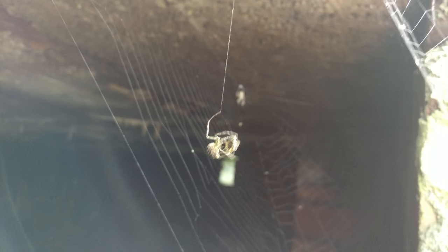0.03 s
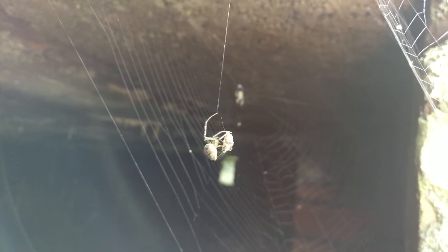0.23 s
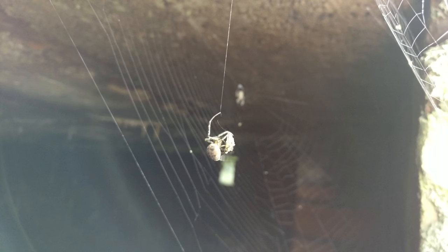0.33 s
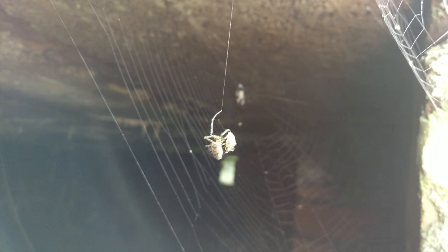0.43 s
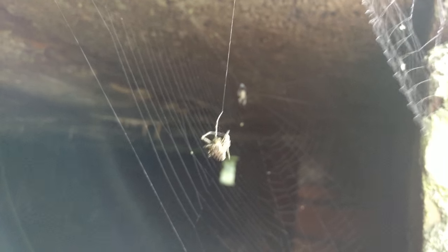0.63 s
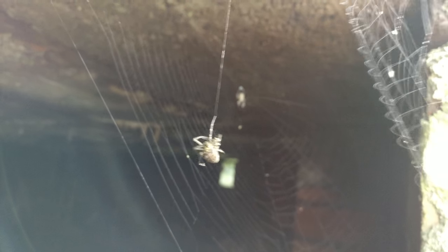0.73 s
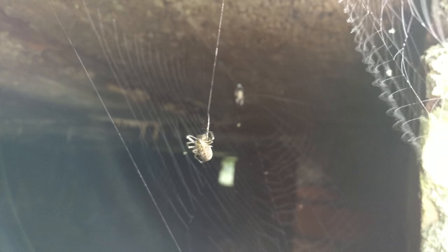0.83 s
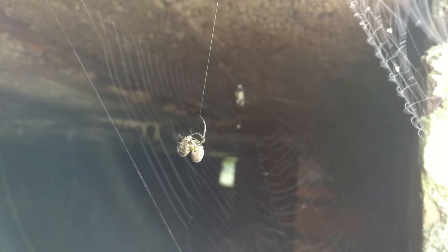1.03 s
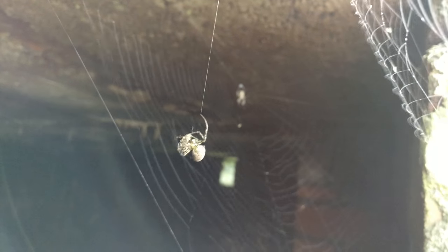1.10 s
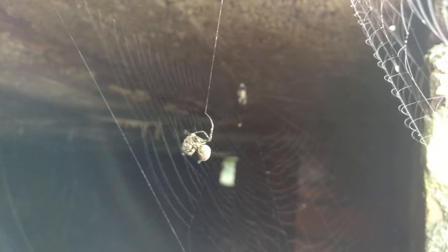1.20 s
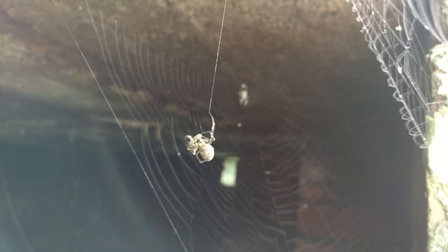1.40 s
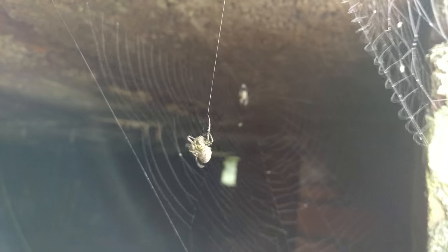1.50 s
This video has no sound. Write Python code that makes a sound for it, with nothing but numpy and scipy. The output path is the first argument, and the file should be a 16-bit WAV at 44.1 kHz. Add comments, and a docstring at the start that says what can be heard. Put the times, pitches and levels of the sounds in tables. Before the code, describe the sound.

Fingers knock on a hand-held camera, right at the microphone: a low thump at the start, a hard clicking thump with a tiny fizz near 0.1 seconds, then a lighter click. Soft low hand bumps continue until about 1.5 seconds. A faint distant clack comes at 0.6, a soft knock at 1.1 and a barely audible tick at 1.2. Quiet outdoor rumble, a traffic-like wash and faint hiss lie underneath.

```python
"""Fingers knock on a hand-held camera, right at the microphone, outdoors on a quiet day. Each knock is
a tiny tick and a pressure push that the microphone's bass cut turns into a short low thump; the hardest
one overloads and fizzes. The hand shifts in soft low bumps. Further off something clacks, and later
comes a faint tick. Behind it all lie a low rumble, a far wash like traffic, and faint hiss."""
import sys
import numpy as np
from scipy import signal
from scipy.fft import rfft, irfft
from scipy.io import wavfile
from scipy.ndimage import uniform_filter1d

SR = 44100
rng = np.random.default_rng(int(sys.argv[2]) if len(sys.argv) > 2 else 0)


def wav_record(signal):
    """Record a signal, one row per channel, as 16-bit PCM in the file named by sys.argv[1]."""
    frames = np.transpose(np.atleast_2d(signal))
    bounded = np.clip(frames, -1, 1)
    # unit amplitude maps onto the largest positive 16-bit level
    quanta = np.round(bounded * 32767).astype(np.int16)
    wavfile.write(sys.argv[1], SR, quanta)


N = 68355


def from_db(db):
    """Decibels to gain."""
    return 10 ** (np.asarray(db) / 20)


def rms_one(x):
    """Scale to rms 1."""
    return x / np.sqrt(np.mean(x ** 2) + 1e-20)


def level(rows):
    """Gain over time from points of seconds and dB."""
    seconds, db = np.transpose(rows)
    return from_db(np.interp(np.arange(N) / SR, seconds, db))


def noise(spectrum):
    """Noise of rms 1, coloured by points of Hz and relative dB."""
    hz, db = np.transpose(spectrum)
    bins = np.maximum(np.arange(N // 2 + 1) * SR / N, 1)
    gain = from_db(np.interp(np.log(bins), np.log(hz), db)) * np.minimum(bins / hz[0], 1)
    return rms_one(irfft(rfft(rng.standard_normal(N)) * gain, N))


def ring(x, hz, t60):
    """One mode: a click sets off a sine that falls 60 dB in t60 seconds."""
    r, w = from_db(-60 / (t60 * SR)), 2 * np.pi * hz / SR
    return signal.lfilter([0, np.sin(w)], [1, -2 * r * np.cos(w), r * r], x + 1e-18)


def section(x, hz, q, kind):
    """Second-order high-pass or notch."""
    w = 2 * np.pi * hz
    top = [1, 0, 0] if kind == "high" else [1, 0, w * w]
    return signal.lfilter(*signal.bilinear(top, [1, w / q, w * w], SR), x + 1e-18)


def low_pass(x, hz):
    """Gentle first-order low-pass."""
    return signal.lfilter(*signal.butter(1, hz, fs=SR), x)


def knocks():
    """Fingers on the case push on the microphone, ring the case low, click and tick."""
    # Each row: start in seconds, push in dB, push length in seconds, contact hardness in Hz,
    # then click, bright tick and low ring, each in dB.
    contacts = [(-0.0215, -8.5, .0013, 900, -65.5, -70, -25),
                (0.0704, -3.5, 0.0014, 1500, -17.5, -37, -5.5),
                (0.1454, -20.5, 0.001, 4100, -23.5, -48, -35), (1.0916, -40, 0.00097, 600, -92, -90, -19.5)]
    # Low modes of the case. Each row: pitch in Hz, level in dB, seconds to fall 60 dB.
    case_modes = [(153.3, -27.5, 0.06), (237, -34.5, 0.067), (313, -50, 0.044), (590, -51.5, 0.042),
                  (905, -56, 0.044)]
    # The microphone's bass cut. Each row: corner in Hz and Q of one resonant high-pass.
    bass_cut = [(57.6, 1.51), (39.7, 1.05)]
    overload_top = 0.14   # full scale is 1
    lead = int(0.1 * SR)   # room for a knock just before time zero
    t = np.arange(-lead, N) / SR
    push, blows, clicks, ticks = np.zeros((4, lead + N))
    for start, push_db, length, contact_hz, click_db, tick_db, ring_db in contacts:
        age = np.maximum(t - start, 0) / length
        pulse = from_db(push_db) * age * np.exp(-age)
        push += low_pass(pulse + 1e-18, contact_hz)   # a soft contact rounds the push
        at = lead + int(start * SR)
        blows[at], clicks[at], ticks[at] = from_db([ring_db, click_db, tick_db])
    push += sum(from_db(db) * ring(blows, hz, t60) for hz, db, t60 in case_modes)
    for hz, q in bass_cut:
        push = section(push, hz, q, "high")
    push = overload_top * np.tanh(push / overload_top)
    hollow_thump = section(push, hz=430, q=4, kind="notch")
    dull_clicks = low_pass(clicks, hz=3150)
    roll_off = signal.butter(5, 3400, fs=SR, output="sos")
    tick_band = signal.butter(1, [8700, 12300], "band", fs=SR, output="sos")
    body = signal.sosfilt(roll_off, hollow_thump + dull_clicks)
    bright_ticks = signal.sosfilt(tick_band, ticks + 1e-18)
    return (body + bright_ticks + fizz(push))[lead:]


def fizz(push):
    """The microphone overloads: each big swing sets off a short rough whistle, weaker each time."""
    # The whistle and its octave. Each row: multiple of the pitch, level in dB.
    partials = [(1, -52.5), (2, -57.5)]
    pitch_hz, waver_hz, smooth_hz, fade_s = 5990, 210, 690, 0.0055
    overloaded = np.abs(push) > 0.08
    overloaded_s = np.cumsum(overloaded) / SR
    gate = low_pass(overloaded * np.exp(-overloaded_s / fade_s) + 1e-18, smooth_hz)
    waver = rms_one(low_pass(rng.standard_normal(len(push)), smooth_hz))
    phase = 2 * np.pi * np.cumsum(pitch_hz + waver_hz * waver) / SR
    return gate * sum(from_db(db) * np.sin(multiple * phase) for multiple, db in partials)


def hand_bumps():
    """The hand shifts on the camera: each bump is a round swell of a few low cycles."""
    # Each row: centre in seconds, peak in dB, half length in seconds, pitch in Hz.
    bumps = [(0.173, -45, 0.02, 52), (0.227, -48.5, 0.016, 60), (0.291, -49.5, 0.028, 56),
             (0.399, -52, 0.016, 58.6), (0.524, -49.5, 0.017, 61.3), (0.63, -49.5, 0.013, 73),
             (0.802, -47, .02, 78.3), (1.115, -47.5, 0.0087, 61.4), (1.368, -45, 0.028, 62),
             (1.443, -47, 0.0085, 51.7), (1.507, -43.5, 0.02, 59.6)]
    t, out = np.arange(N) / SR, 0
    for (centre, db, half, hz), turn in zip(bumps, rng.random(len(bumps))):
        swell = np.exp(-np.abs((t - centre) / half) ** 3)
        out = out + from_db(db) * swell * np.sin(2 * np.pi * (hz * (t - centre) + turn))
    return out


def far_clack():
    """A light clack some way off, smeared by reflections from nearby walls."""
    # A hit and a weaker rebound. Each row: start in seconds, level in dB.
    hits = [(0.5718, -56), (0.5926, -63)]
    # Modes of the struck thing. Each row: pitch in Hz, level in dB, seconds to fall 60 dB.
    modes = [(289, -1, 0.14), (560, -8, 0.082), (838, -2, 0.045), (1070, -5, 0.05), (1274, 2, 0.067),
             (1387, -7, 0.12), (1975, -13.5, .05), (2310, -15, 0.066), (3110, -16.5, 0.044),
             (3850, -18.5, .05), (4470, -25, 0.055), (5070, -32, .05)]
    # Scatter off the walls. Each row: frequency in Hz, relative density in dB.
    scatter = [(200, 0), (800, 0.5), (1100, -0.5), (1400, 4.5), (1750, -14), (2400, -17), (2800, -43),
               (3200, -29), (4600, -29), (5600, -46), (12000, -52)]
    hold_s, t60_s = 0.022, 0.055
    clicks = np.zeros(N)
    for start, db in hits:
        clicks[int(start * SR)] = from_db(db)
    body = sum(from_db(db) * ring(clicks, hz, t60) for hz, db, t60 in modes)
    age = np.arange(N) / SR - hits[0][0]
    fade = (age > 0) * from_db(-60 * np.maximum(age - hold_s, 0) / t60_s)
    return body + from_db(-58.5) * fade * noise(scatter)


def faint_tick():
    """A tiny dry tick in the distance that barely clears the background."""
    # Each row: frequency in Hz, relative density in dB.
    colour = [(1200, -20), (2000, -5), (2900, 3), (3500, -11), (4500, -12), (6000, -27)]
    start_s, t60_s = 1.169, 0.043
    age = np.arange(N) / SR - start_s
    fade = (age > 0) * from_db(-60 * np.maximum(age, 0) / t60_s)
    return from_db(-80) * fade * noise(colour)


def rumble():
    """A low bed of moving air, evened out so that it drifts only slowly."""
    # Each row: frequency in Hz, relative density in dB.
    colour = [(20, -19), (35, -11.5), (50, -3.5), (65, 0.5), (85, -3), (105, -5.5), (135, -22),
              (300, -40.5), (1000, -75.5)]
    # Each row: time in seconds, level in dB.
    drift = [(0, -54.5), (.2, -56), (.45, -60.5), (.7, -58.5), (.9, -61.5), (1.2, -61), (1.55, -59)]
    air = noise(colour)
    power = uniform_filter1d(air ** 2, int(0.064 * SR))
    return level(drift) * air / np.sqrt(power + 1e-6)


def far_wash():
    """A wash like traffic a long way off; its level flickers slightly."""
    # Each row: frequency in Hz, relative density in dB.
    colour = [(30, -12), (100, -3), (140, -3.5), (190, -0.5), (265, 2.5), (330, -9.5), (400, -12),
              (530, -7), (680, -10), (850, -11), (1020, -7.5), (1250, -18), (1500, -21), (2100, -25.5),
              (2800, -35.5), (4500, -43.5), (13000, -56.5)]
    # Each row: time in seconds, level in dB.
    drift = [(0, -64.5), (.25, -63), (.5, -64), (.8, -63.5), (1.0, -64.5), (1.2, -67), (1.35, -63),
             (1.55, -65.5)]
    flicker_db, flicker_hz = 1.5, 14
    flicker = rms_one(low_pass(low_pass(rng.standard_normal(N), flicker_hz), flicker_hz))
    return level(drift) * from_db(flicker_db * flicker) * noise(colour)


def hiss():
    """Faint steady hiss under everything."""
    # Each row: frequency in Hz, relative density in dB.
    colour = [(1000, 1), (4000, 0), (7000, -0.5), (12500, -2), (13200, -12), (16000, -18)]
    return from_db(-89) * noise(colour)


def scene():
    """One microphone: handling noise up close, the outdoors behind it."""
    return (knocks() + hand_bumps() + far_clack() + faint_tick() + rumble() + far_wash() + hiss())[None]


def record(dry):
    """The top is cut steeply, 60 dB down at 14.7 kHz."""
    return signal.sosfilt(signal.cheby2(12, 60, 14700, fs=SR, output="sos"), dry)


dry = scene()
out = record(dry)
wav_record(out)
```